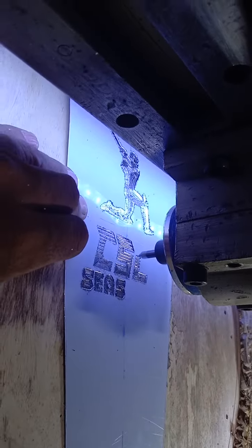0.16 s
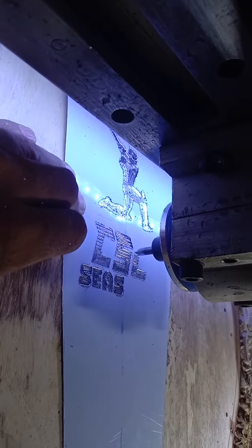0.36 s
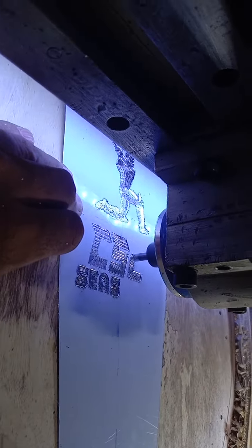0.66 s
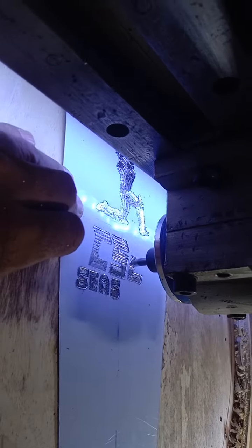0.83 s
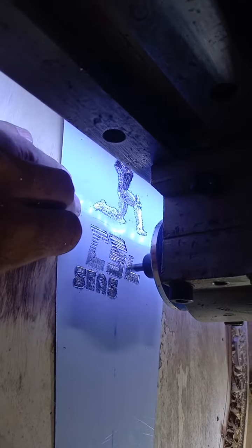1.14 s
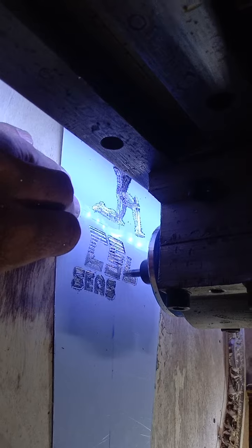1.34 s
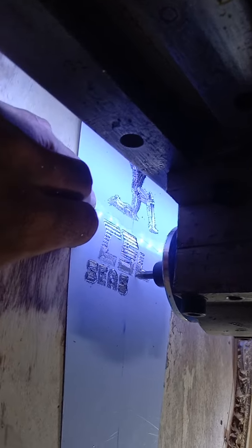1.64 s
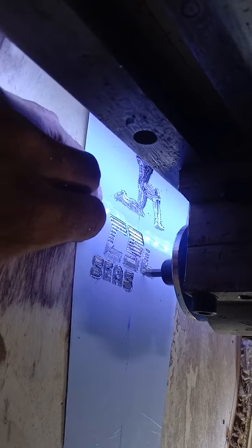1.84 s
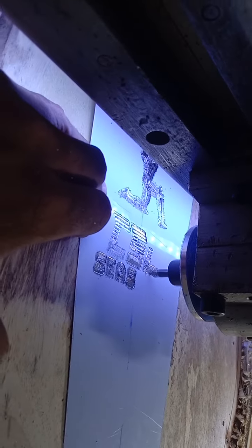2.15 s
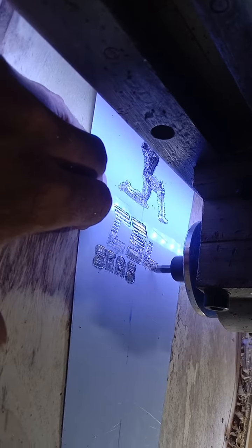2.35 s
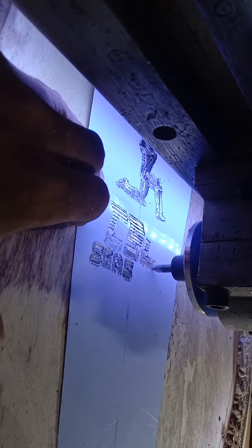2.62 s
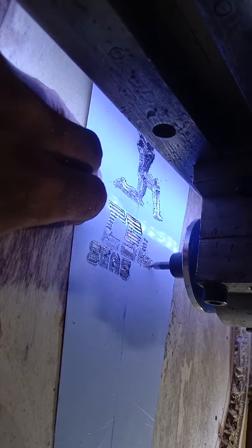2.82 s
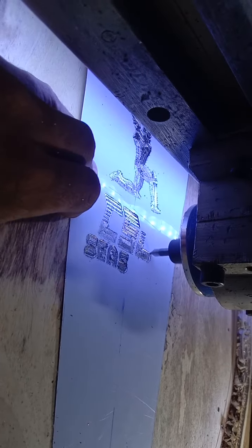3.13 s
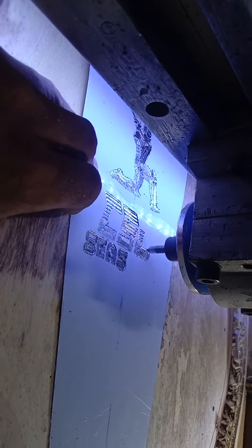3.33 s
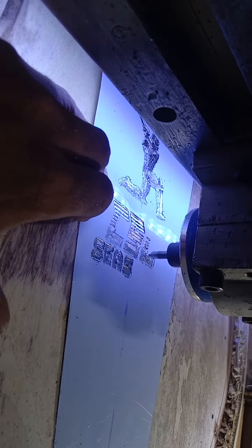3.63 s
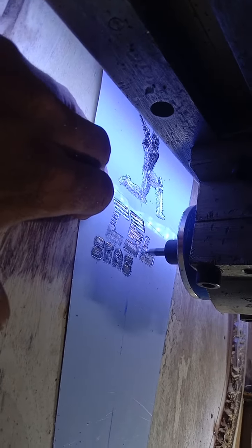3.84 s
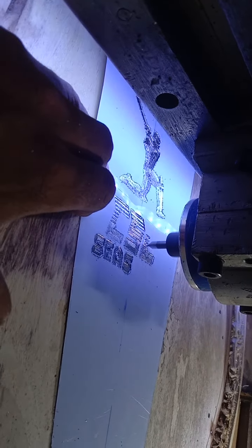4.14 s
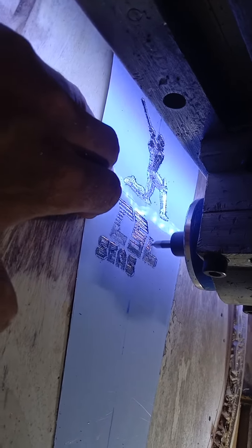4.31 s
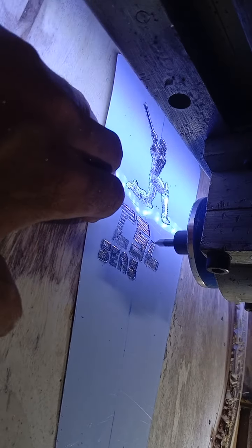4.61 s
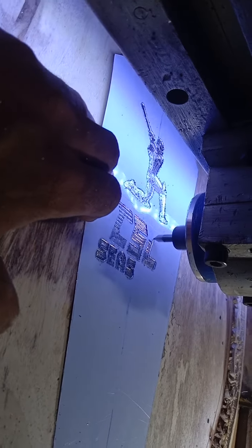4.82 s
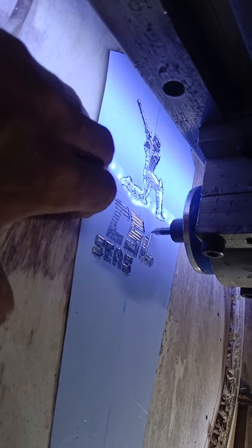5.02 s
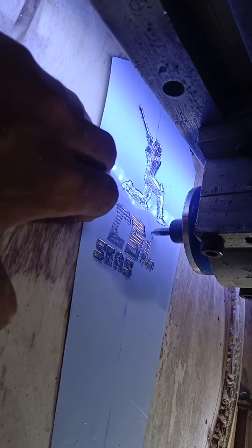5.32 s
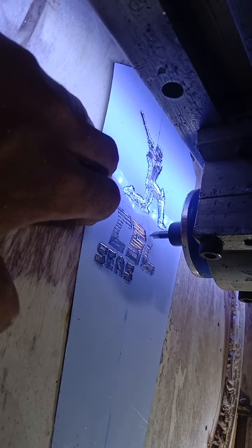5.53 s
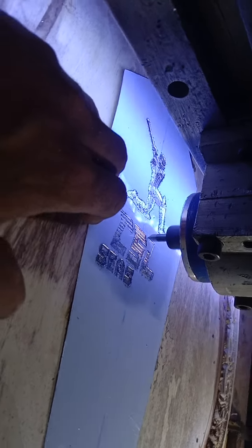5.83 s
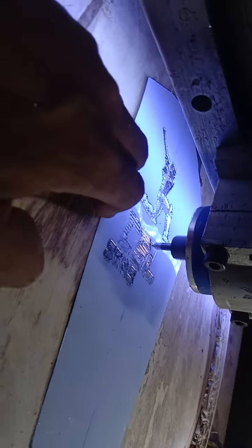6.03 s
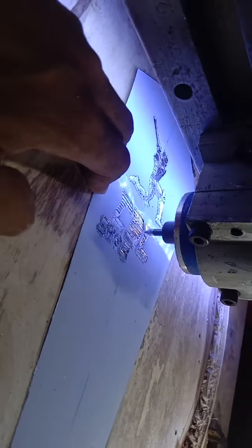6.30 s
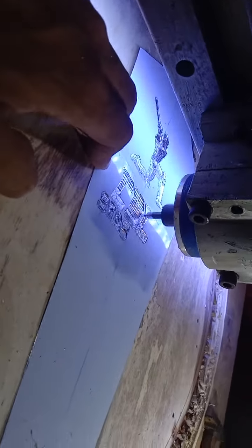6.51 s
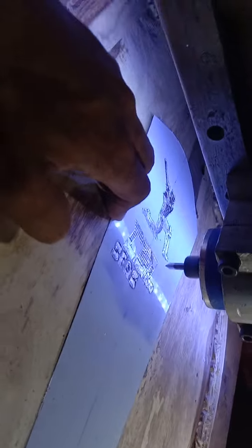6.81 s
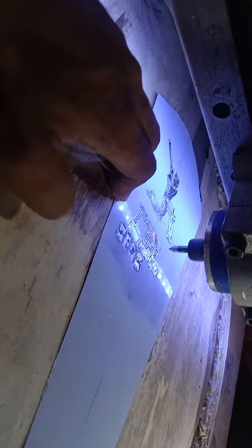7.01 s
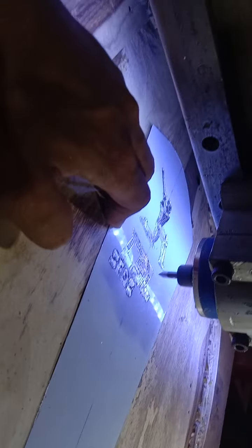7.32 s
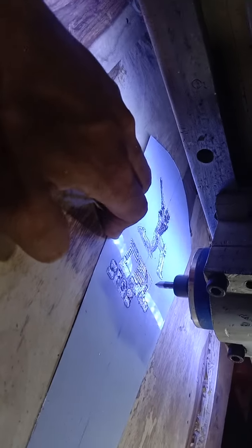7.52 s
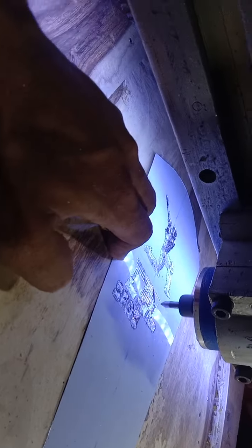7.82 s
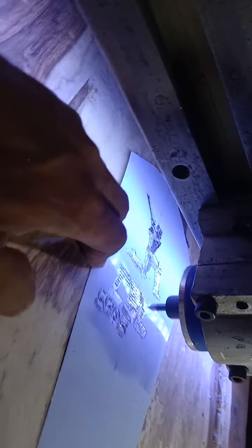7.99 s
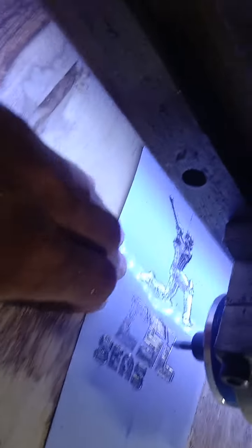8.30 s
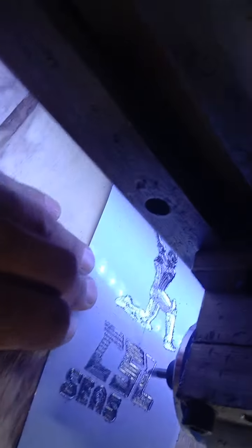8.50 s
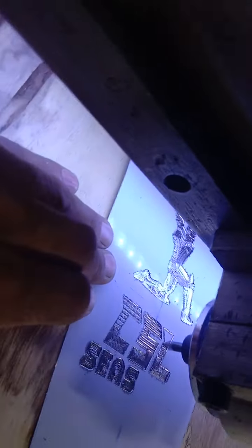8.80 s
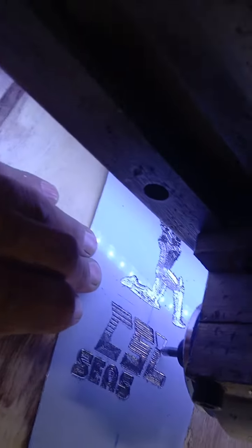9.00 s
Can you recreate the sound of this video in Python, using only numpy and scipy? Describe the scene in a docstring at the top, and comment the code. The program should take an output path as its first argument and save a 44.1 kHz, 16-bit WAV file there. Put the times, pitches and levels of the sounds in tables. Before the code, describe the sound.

A small engraving spindle whines close by, its piercing tone riding on a steady rush of cooling air. Almost at once the bit bites into a steel sheet: the whine flutters and slowly sags, chips rasp, and a rattling hum and low drones come and go. Near the end the bit lifts and the spindle runs smoother, rising in pitch, before cutting again briefly. The workshop behind is very quiet.

```python
"""CNC spindle engraving steel

A small spindle, heard close by at about 34,000 rpm, whines on the orders (harmonics) of its shaft and
sags in pitch under load. While it cuts, each stroke of the bit rebalances the low orders and makes them
flutter, chips rasp, and a half-speed hum and the drones of sheet and bed come and go; between cuts it
runs free. Turbulent cooling air rushes through the housing, over a faint room rumble."""
import sys
import numpy as np
from scipy.fft import rfft, irfft, next_fast_len
from scipy.io import wavfile
from scipy.ndimage import uniform_filter1d, map_coordinates

SR = 44100
rng = np.random.default_rng(int(sys.argv[2]) if len(sys.argv) > 2 else 0)


def waveform_to_disk(signal):
    """Save audio, clipped to [-1, 1], as 16-bit WAV at the path in sys.argv[1]."""
    frames = np.transpose(np.atleast_2d(signal))
    scaled = np.clip(frames, -1, 1) * 32767
    samples = np.round(scaled).astype(np.int16)
    wavfile.write(sys.argv[1], SR, samples)


N = 403515
TIME = np.arange(N) / SR


def amp(db):
    """Decibels to amplitude ratio."""
    return 10 ** (np.asarray(db) / 20)


def unit(x):
    """Normalisation to rms 1."""
    return x / np.sqrt(np.mean(np.abs(x) ** 2) + 1e-20)


def curves(rows):
    """Linear interpolation of each column after the time."""
    times, *columns = np.transpose(rows)
    return [np.interp(TIME, times, column) for column in columns]


def held(rows, glide_s):
    """Smoothed steps: each row holds until the next."""
    times, *columns = np.transpose(rows)
    row = np.maximum(np.searchsorted(times, TIME, side="right") - 1, 0)
    return [uniform_filter1d(column[row], max(1, int(glide_s * SR))) for column in columns]


def gate(start, end, attack_s, release_s):
    """Trapezoidal envelope, 0-1."""
    return np.clip(np.minimum((TIME - start) / attack_s, (end - TIME) / release_s), 0, 1)


def wobble(rate):
    """Smooth random modulation of rms 1, with rate knots a second."""
    coarse = np.arange(0, N + 32, 32)
    knots = rng.standard_normal(int(N * rate / SR) + 4)
    spline = map_coordinates(knots, [coarse * rate / SR], mode="nearest")
    return unit(np.interp(np.arange(N), coarse, spline))


def swirl(rate):
    """Complex random modulation of amplitude and phase, rms 1."""
    return unit(wobble(rate) + 1j * wobble(rate))


def phase_of(hz):
    """Phase as the time integral of frequency."""
    return 2 * np.pi * np.cumsum(hz) / SR


def tone(phase, envelope):
    """A sinusoidal carrier under a complex envelope, rms 1."""
    return np.sqrt(2) * np.real(unit(envelope) * np.exp(1j * phase))


def filtered(x, response):
    """Linear filtering: the spectrum times a frequency response."""
    size = next_fast_len(N + 8192)
    return irfft(rfft(x, size) * response(np.fft.rfftfreq(size, 1 / SR)), size)[:N]


def noise(spectrum):
    """White noise shaped by (frequency [Hz], level [dB]) points, rms 1."""
    freqs, db = np.transpose(spectrum)
    colour = lambda hz: amp(np.interp(np.log(hz + 1), np.log(freqs), db, right=-120))
    return unit(filtered(rng.standard_normal(N), colour))


# shaft speed, sagging under load and recovering as the bit lifts: (time [s], rotation rate [Hz])
SHAFT_SPEED = [(0.0, 582), (0.55, 583.3), (1.08, 578), (1.42, 570.8), (2.3, 559.1), (2.9, 556.7),
               (3.2, 554.2), (3.85, 555.9), (4.11, 554.6), (4.66, 557.7), (5.38, 550.9), (6.02, 549),
               (6.54, 540.7), (7.0, 554), (7.56, 566.3), (8.29, 572.6), (8.81, 576.0), (9.15, 572.4)]
# spells of loading, in which the bed rumbles and chips rasp, running on through short lifts of the bit: (start
# [s], end [s])
LOAD_SPELLS = [(0.56, 7.05), (8.86, 9.3)]


def drive(effort_db_per_hz=0.108, idle_db=-24):
    """Mechanical loading: the more the shaft sags, the harder the bit is cutting."""
    speed, = curves(SHAFT_SPEED)
    load = sum(gate(start, end, attack_s=0.05, release_s=0.1) for start, end in LOAD_SPELLS)
    effort = load * amp(effort_db_per_hz * (speed.mean() - speed)) + amp(idle_db) * (1 - load)
    return phase_of(speed), load, effort


# the spindle's low orders, stroke by stroke while cutting, and running free between cuts:
# (start [s], five levels for orders 1 to 5 [dB], flutter [0-1])
LOW_ORDERS = [(0, -24.5, -26.5, -22.8, -33, -35, .2), (.58, -21.7, -15, -21.5, -31.5, -28.5, 0.8),
              (1.09, -18, -14, -23.5, -28, -30.5, 0.66), (1.48, -22.4, -13.5, -16, -24.5, -38, .5),
              (1.715, -20, -17.5, -19.5, -38, -34, 0.73), (2.1, -22, -17.3, -21.5, -37, -30, .85),
              (2.8, -18, -18, -21, -38.5, -38, 0.53), (3.23, -21.5, -31.5, -18, -36, -48, 0.62),
              (3.93, -16.5, -21.5, -25, -34, -37, 0.8), (4.12, -19.5, -26, -20.5, -33, -34, 0.56),
              (4.69, -22, -13.8, -28.2, -30, -39, 0.3), (5.25, -26.5, -31.5, -19, -29, -42, 0.66),
              (5.98, -25.5, -19, -23, -29, -32.5, 0.73), (6.44, -21.5, -16, -32, -28.5, -33, .6),
              (6.62, -30, -25, -40, -35, -39, 0), (7.15, -29.5, -25.5, -28.5, -36, -52, .15),
              (8.12, -34.5, -25.5, -22.4, -33, -39, .05), (8.42, -25, -23.7, -23.2, -35, -38.5, 0.2),
              (8.88, -16, -22, -41, -23, -31.5, 0.6)]


def spindle(shaft, load, hatch_hz=15.3, turn_s=0.013):
    """Harmonic series: the five lowest shaft orders, modulated during cuts by the tip's uneven bite."""
    *levels, flutter = held(LOW_ORDERS, glide_s=0.023)
    # while cutting, the tip loses its bite as it changes direction, and skips now and then
    turning = 0.74 * load * sum(np.exp(-((TIME - start) / turn_s) ** 2) for start, *_ in LOW_ORDERS[1:])
    skips = np.clip(wobble(55) - 0.35, 0, 1)
    # during cuts the tone pulses as the bit zigzags to fill the letters
    hatch_db = 0.68 * flutter * np.sin(phase_of(hatch_hz * (1 + 0.097 * wobble(3))))
    flutter_depths, contact_losses = (0.17, 0.2, 0.17, 0.45, 0.5), (0.2, 0, 1, 0.4, 0.6)
    out = np.zeros(N)
    for order, (db, depth, loss) in enumerate(zip(levels, flutter_depths, contact_losses), 1):
        shake = 1 + flutter * (depth * swirl(60) + 0.048 * swirl(170))
        contact = np.clip(1 - loss * (flutter ** 2 * skips + turning), 0, 1)
        stagger = np.pi * order ** 2 / 3  # staggers the orders' phases so their peaks do not pile up
        jolt_db = 3 * turning * (order == 2)  # catching at a turn throws the ring onto order 2
        out += amp(db + hatch_db + jolt_db) * tone(order * shaft + stagger, contact * shake)
    return out


# sixth order: (time [s], level [dB])
SIXTH_ORDER = [(0, -30), (.55, -27.5), (1, -35), (3.9, -29.5), (4.35, -35), (5, -29.5), (5.85, -27.5),
               (6.2, -37.5), (6.52, -29), (6.8, -36.5), (8.6, -38.5), (9, -28.5)]
# piercing eighth order, fading and returning as the microphone moves: (time [s], level [dB])
WHINE = [(0, -23.5), (.5, -24), (1.1, -34), (1.7, -27.5), (2.7, -32), (3.3, -39), (4.05, -35), (4.35, -26),
         (5.85, -26.5), (6.9, -34.5), (7.25, -26), (7.8, -26.5), (8.02, -33), (8.18, -22.5), (8.35, -32),
         (8.55, -22), (9.15, -38)]
# thin whistle of the fan: (time [s], level [dB])
FAN_WHISTLE = [(0, -49), (2.8, -54), (3.8, -42.5), (4.9, -58), (5.5, -44), (6.1, -47), (6.55, -64),
               (6.9, -38.5), (9.15, -45)]
# weaker steady overtones: (order [cycles per turn], level [dB])
FAINT_ORDERS = [(7, -45.5), (9, -51), (10, -41), (11, -53.5), (12, -54.5), (16, -70), (20, -68), (22, -58)]


def motor(shaft):
    """Rotational harmonics: rotor and fan whine on high orders, which phase jitter blurs as they rise."""
    jittered = shaft + 0.018 * wobble(45)
    lines = [(6, *curves(SIXTH_ORDER)), (8, *curves(WHINE)), (24, *curves(FAN_WHISTLE)), *FAINT_ORDERS]
    out = np.zeros(N)
    for order, db in lines:
        level = amp(db + 0.6 * wobble(5))
        out += level * tone(order * jittered + rng.uniform(0, 2 * np.pi), 1 + 0.2 * swirl(30))
    return out


# bouts of rattling: (start [s], end [s], level [dB])
RATTLES = [(1.08, 1.82, -35), (1.99, 6.7, -30.5), (8.9, 9.3, -40)]


def rattle(shaft, third_db=-11):
    """Period doubling: the loaded bit bounces differently every second turn and hums at half speed."""
    level = sum(amp(db) * gate(start, end, attack_s=0.06, release_s=0.07) for start, end, db in RATTLES)
    subharmonic = tone(shaft / 2, 1 + 0.28 * swirl(35))
    third_partial = amp(third_db) * tone(3 * shaft / 2, 1 + 0.6 * swirl(30))
    return level * (subharmonic + third_partial)


# air roaring in the housing: (time [s], level [dB])
ROAR_LEVEL = [(0, -22), (1, -23.4), (4.3, -23), (5.9, -23.5), (6.5, -22.5), (7.4, -26), (8.4, -22.5),
              (9.15, -21)]
# bright bands as the microphone moves round the spindle: (time [s], vent [dB], scrape [dB], hiss [dB])
BAND_LEVELS = [(0, -27.5, -23, -41), (1.1, -28.5, -26, -45), (3.4, -28.4, -24.7, -46.5),
               (4.3, -27, -23.5, -45.5), (5.1, -28, -25, -48), (5.85, -25.5, -22, -44),
               (6.1, -26.5, -24.5, -41), (6.35, -27, -29.5, -40.5), (6.55, -24.5, -27, -44),
               (6.9, -32.5, -30, -39), (7.6, -32.5, -26.5, -37.7), (8.5, -34, -29, -38),
               (9.15, -31, -29.5, -43)]
# spectra of the roar and the three bright bands: (frequency [Hz], relative level [dB])
HOUSING_SPECTRUM = [(180, -72), (340, -23), (500, -16), (600, -11.5), (700, -11), (850, -4), (980, -10),
                    (1120, -3), (1240, 3), (1480, -0.5), (1750, -9.5), (2050, -4.5), (2450, -9.5),
                    (2900, -34)]
VENT_SPECTRUM = [(2000, -59), (2500, -6), (2750, -1), (3100, -1.5), (3500, 4.5), (3750, -1.5), (4300, -32)]
SCRAPE_SPECTRUM = [(3100, -57.5), (3750, 1), (4150, 1.5), (4600, 2.5), (5000, -3.5), (5350, -8.5),
                   (5800, -6), (6300, -11.5), (6750, -14.5), (7500, -32.5), (8300, -51), (10000, -72)]
HISS_SPECTRUM = [(6000, -18.5), (8300, -15), (10000, -10), (11200, -6), (12200, -1), (13300, 0),
                 (14500, -4.5), (15500, -4.5)]


def rush(shaft, unsteady_db=0.62):
    """Turbulence and friction: cooling air and the scraping tip radiate broadband noise."""
    roar_db, = curves(ROAR_LEVEL)
    vent_db, scrape_db, hiss_db = curves(BAND_LEVELS)
    roar = amp(roar_db + unsteady_db * wobble(14)) * noise(HOUSING_SPECTRUM)
    vent = amp(vent_db) * noise(VENT_SPECTRUM)
    scrape = amp(scrape_db) * noise(SCRAPE_SPECTRUM)
    hiss = amp(hiss_db) * noise(HISS_SPECTRUM)
    swell = unit(1 + 0.29 * np.cos(shaft))  # once a turn
    treble = gantry(vent + scrape) * swell + dulled(gantry(hiss, share=0.27))
    return roar + treble * amp(unsteady_db * wobble(25))


# reflection off the gantry, growing after about 6.5 s: (time [s], strength [0-1], delay [s])
REFLECTION = [(0, 0.02, 0.000483), (5.9, 0, .00044), (6.5, 0.23, 0.000474), (6.9, 0.42, 0.000511),
              (7.8, .63, 0.000488), (8.3, .88, 0.000482), (9.15, .7, .00048)]


def gantry(x, share=1):
    """Comb filtering: a short reflection, its delay nearly steady, interferes with the direct sound and colours
    it with regular notches."""
    strength, delay = curves(REFLECTION)
    echo = map_coordinates(x, [np.arange(N) - delay * SR], mode="nearest")
    return (x - share * strength * echo) / np.sqrt(1 + (share * strength) ** 2)


def dulled(x, edge_hz=13600, loss_db=-12):
    """High-shelf attenuation: the top of the hiss fades for a moment."""
    top = filtered(x, lambda hz: np.clip((hz - edge_hz) / 800 + 0.5, 0, 1))
    dip = gate(start=6.25, end=6.88, attack_s=0.2, release_s=0.12)
    return x + top * (amp(loss_db * dip) - 1)


# rasp of the chips: (frequency [Hz], relative level [dB])
CHIP_SPECTRUM = [(250, -83), (750, -9.5), (1100, 1), (1750, 6.5), (2700, -11), (4000, -27)]


def chips(effort):
    """Fracture noise: chips tearing from the steel rasp in proportion to the cutting effort."""
    return amp(-31) * effort * noise(CHIP_SPECTRUM)


# drones of sheet and bed: (start [s], end [s], frequency [Hz], level [dB], roughness [0-1])
DRONES = [(0.567, 1.102, 303, -39.5, 0.83), (0.598, 1.778, 244, -49.5, 0.1), (1.1, 1.616, 449, -38.5, 0.1),
          (2.25, 3.0, 447, -45, 0.8), (2.792, 3.22, 367, -47, 0.7), (2.8, 3.22, 124, -63.5, 0.4),
          (6.45, 6.6, 121, -61, 0.5), (3.337, 3.965, 305, -40.5, 0.19), (4.0, 5.24, 123, -55.5, 0.4),
          (4.0, 4.7, 438, -40.5, 0.1), (4.0, 5.7, 365.6, -49.5, 0.1), (4.701, 6.65, 439, -46, 0.5),
          (6.854, 7.051, 221, -52, 1), (8.879, 9.15, 237, -48.5, 0.7)]
# rumble of the bed: (frequency [Hz], relative level [dB])
BED_SPECTRUM = [(20, -30), (70, -30), (120, -26), (180, -6.5), (215, 1.5), (300, 5.5), (420, 2), (520, -4),
                (800, -25)]


def sheet_and_bed(effort, drift=0.00485):
    """Forced vibration: feeding the bit sets sheet and bed droning over a dull rumble."""
    out = amp(-47) * effort * noise(BED_SPECTRUM)
    for start, end, hz, db, roughness in DRONES:
        shake = 1 - roughness + roughness * swirl(40)
        phase = phase_of(hz * (1 + drift * wobble(3)))
        out += amp(db) * gate(start, end, attack_s=0.02, release_s=0.02) * tone(phase, shake)
    return out


# background of the room: (frequency [Hz], relative level [dB])
ROOM_SPECTRUM = [(20, -7), (60, -5), (100, 10), (150, -3), (250, -2), (3000, -32)]


def room(level_db=-77):
    """Ambient noise: a faint, steady rumble."""
    return amp(level_db) * noise(ROOM_SPECTRUM)


def scene():
    """Superposition: the machine's sources, linked by one shaft and its load, add to the room's rumble."""
    shaft, load, effort = drive()
    tones = spindle(shaft, load) + motor(shaft) + rattle(shaft)
    return (tones + sheet_and_bed(effort) + chips(effort) + rush(shaft) + room())[None]


def record(dry, top_hz=15480):
    """Band limiting: an ideal low-pass filter passes nothing above top_hz."""
    return filtered(dry[0], lambda hz: hz < top_hz)[None]


dry = scene()
out = record(dry)
waveform_to_disk(out)
```